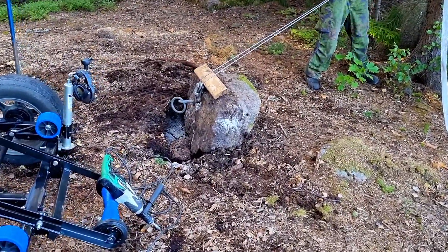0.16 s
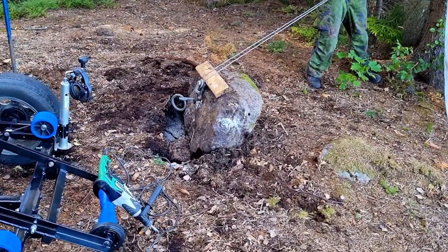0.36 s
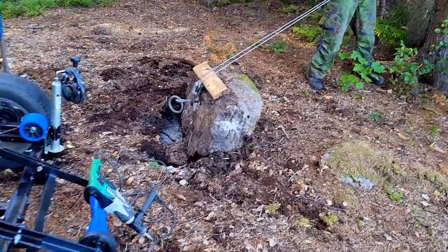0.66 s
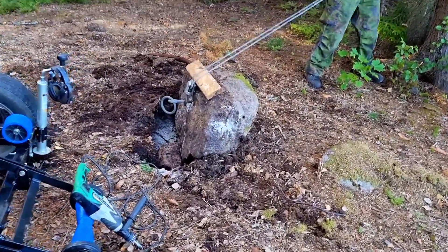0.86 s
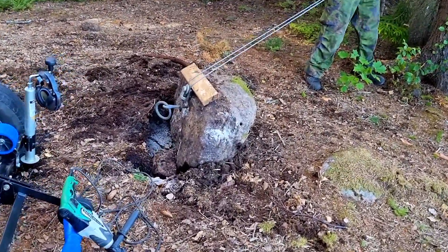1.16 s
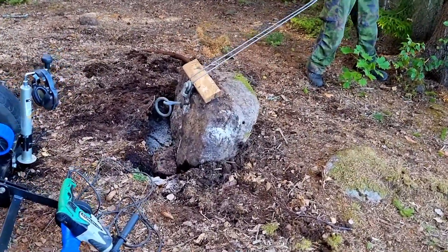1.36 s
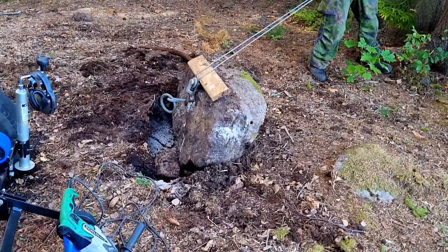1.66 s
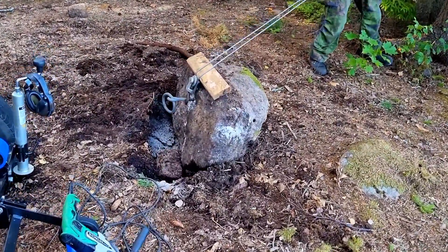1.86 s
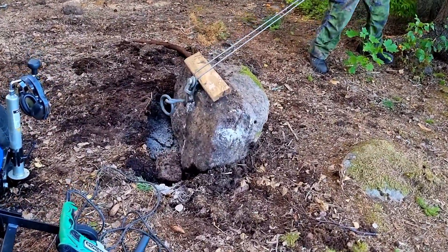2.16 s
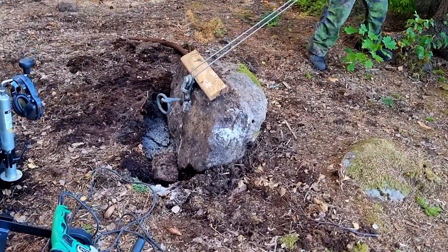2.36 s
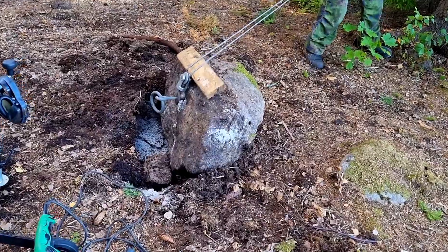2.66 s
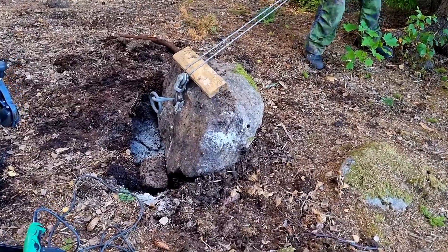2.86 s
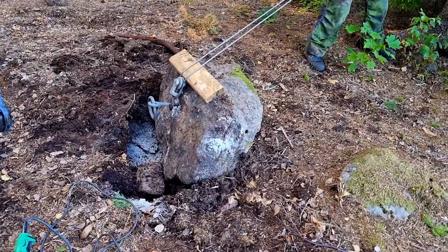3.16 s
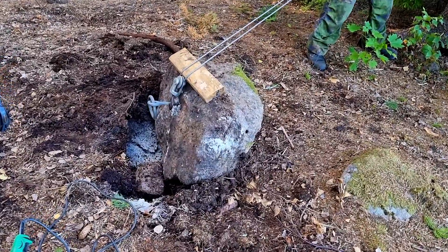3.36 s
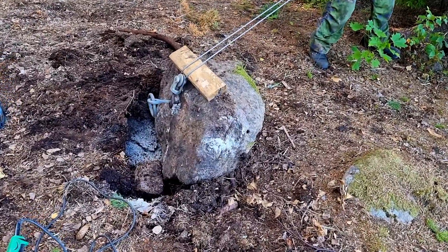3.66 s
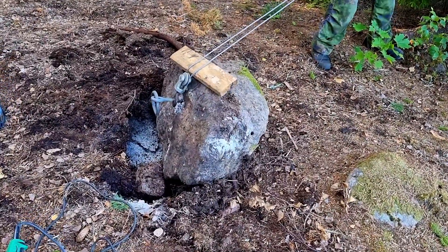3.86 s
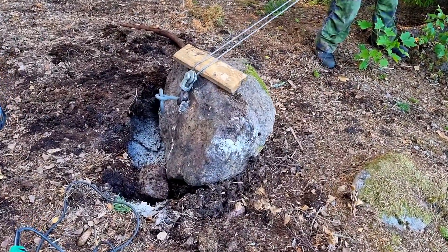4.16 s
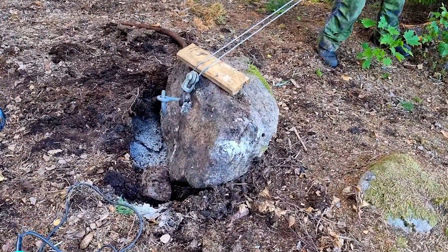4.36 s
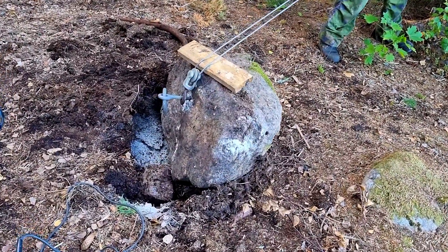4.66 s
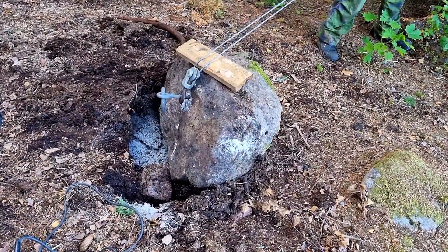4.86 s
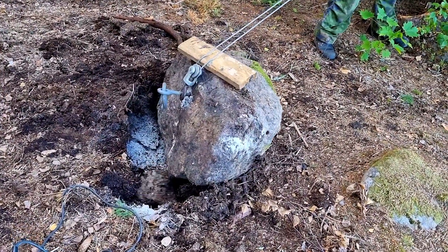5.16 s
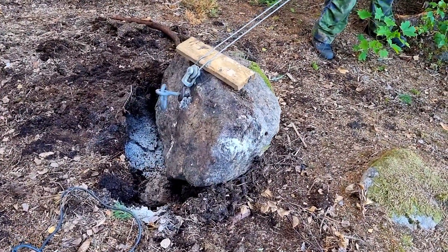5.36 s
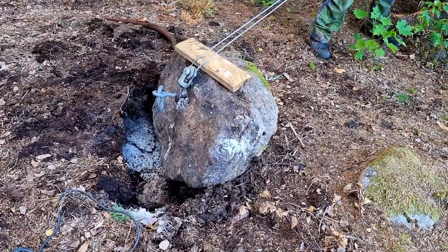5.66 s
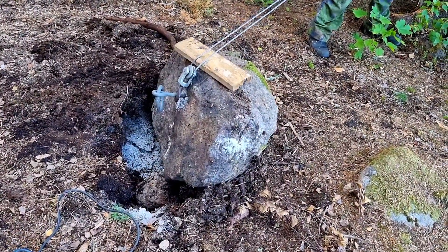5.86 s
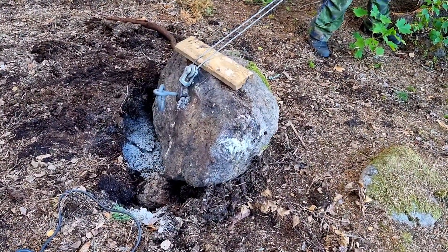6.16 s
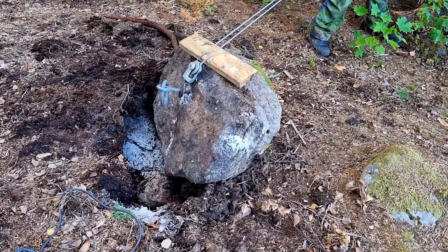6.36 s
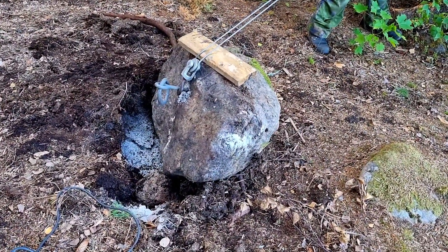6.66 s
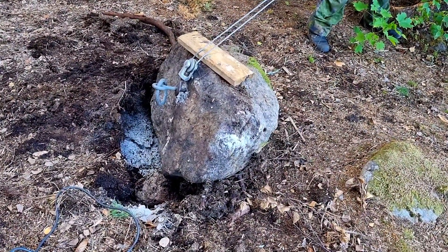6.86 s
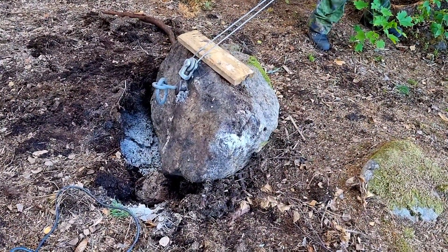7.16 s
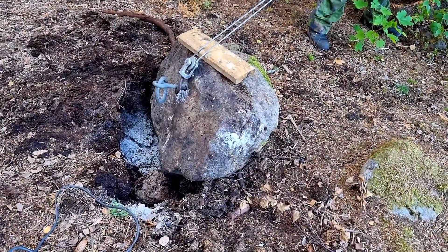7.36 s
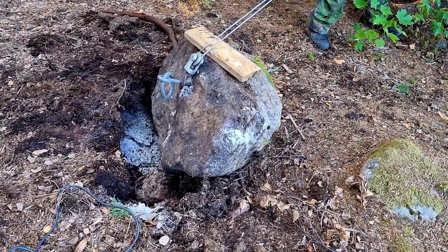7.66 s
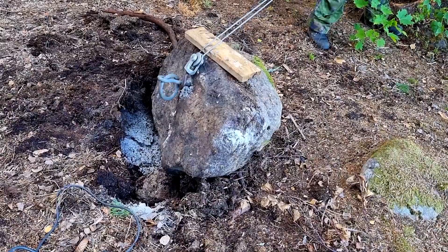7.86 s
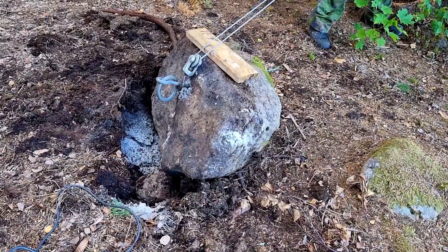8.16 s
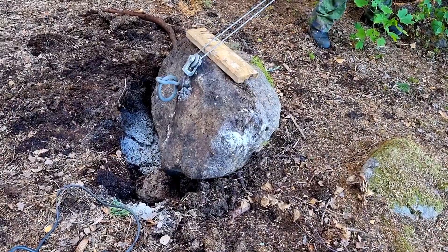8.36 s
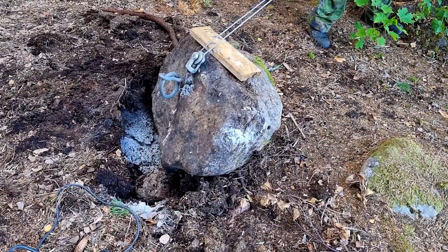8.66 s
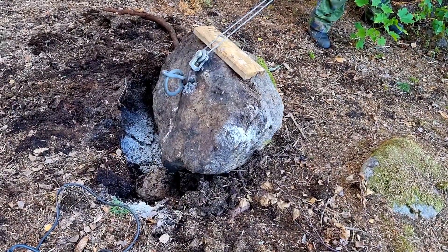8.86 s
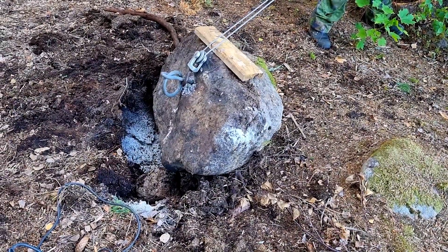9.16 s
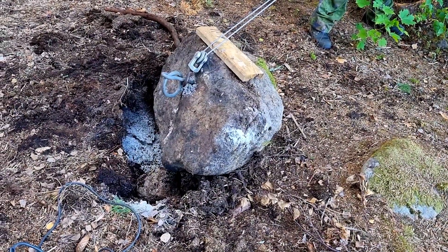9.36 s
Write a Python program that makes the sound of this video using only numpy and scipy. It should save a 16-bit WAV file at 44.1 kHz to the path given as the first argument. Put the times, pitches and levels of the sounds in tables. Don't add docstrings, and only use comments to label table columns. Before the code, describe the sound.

Outdoors in a forest, a hand cable winch works a few steps away, a little right of a stereo microphone. Quick groups of three bright metallic clicks alternate between two pawls, with lever clacks and chain ticks between. The boulder grinds low at first, the cable squeaks briefly before the middle, then the rock drops with a heavy thump. Clicking continues over soft hush with faint bird whistles.

```python
import sys
import numpy as np
from scipy import signal
from scipy.fft import rfft, irfft
from scipy.io import wavfile
from scipy.ndimage import uniform_filter1d

SR = 44100
rng = np.random.default_rng(int(sys.argv[2]) if len(sys.argv) > 2 else 0)


def boost_factor(decibels):
    exponent = np.asarray(decibels, float) / 20
    return 10 ** exponent


def generate_wav(signal):
    frames = np.transpose(np.atleast_2d(signal))
    scaled = np.clip(frames, -1, 1) * 32767
    pcm = np.round(scaled).astype(np.int16)
    wavfile.write(sys.argv[1], SR, pcm)


N = 418943

# time in seconds, pawl ring peak in dB, tooth contact in ms, frame peak in dB,
# loudest frame mode in Hz.
DRIVE_PAWL_DROPS = [(0.8858, -19.5, 5.8, -17, 5400), (0.9556, -15, 3, -17, 5400),
                    (1.0346, -19, 4.0, -18.5, 5600), (2.0926, -12.5, 3.5, -17.5, 2770),
                    (2.1638, -18, 8.9, -16.5, 7160), (2.2332, -18, 4.4, -15.5, 5620),
                    (3.2608, -14, 2.6, -16.5, 5840), (3.3381, -13.5, 2.1, -17.5, 5073),
                    (3.4117, -17.5, 3.95, -16, 5400), (4.5193, -15, 3.9, -17, 4878),
                    (4.5914, -15.5, 6.6, -16, 5000), (4.6807, -18.5, 5.3, -17, 5230),
                    (5.7197, -15, 4.2, -17, 6100), (5.7904, -18, 4.3, -17.5, 4600),
                    (5.8886, -23.5, 4.624, -19.5, 5770), (6.9518, -17, 3.4, -17, 4957),
                    (7.0194, -19, 3.5, -18, 3500), (7.1048, -19, 7.595, -17, 5100),
                    (8.1292, -15, 4.9, -18, 4100), (8.208, -17, 4.7, -19, 5600),
                    (8.2813, -20, 7.0, -17.5, 5230), (9.3423, -17, 4.1, -17.5, 3340),
                    (9.4253, -17.5, 3.654, -17, 5400)]
HOLD_PAWL_DROPS = [(0.0705, -13.5, 4, -19.5, 5400), (0.1523, -14, 2.3, -21, 5300),
                   (0.2358, -16.5, 2.41, -21.5, 5400), (1.388, -14.5, 4.0, -20, 5514),
                   (1.4769, -15, 2.8, -20.5, 7100), (1.5542, -14.5, 2.615, -18.5, 5592),
                   (2.5929, -18, 2.9, -20.5, 5450), (2.6752, -16, 1.8, -19, 2740),
                   (2.7405, -17.5, 1.51, -18, 5600), (3.7864, -16.5, 7.2, -20, 5650),
                   (3.8698, -15, 4, -17.5, 3700), (3.9376, -17, 3.9, -17.5, 5550),
                   (4.9718, -18, 4, -22, 3600), (5.049, -17.5, 2.4, -20.5, 5340),
                   (5.1218, -20, 4.8, -20, 5350), (6.1603, -16, 3.5, -20.5, 5330),
                   (6.2398, -17.5, 2.8, -23, 6996), (6.317, -18, 2.3, -19, 5100),
                   (7.4425, -20, 5.5, -21, 3730), (7.5208, -15, 4.8, -19.5, 5166),
                   (7.596, -19, 3.7, -21.5, 4052), (8.6332, -17.5, 5.5, -20.5, 3300),
                   (8.7094, -17, 4.4, -21.5, 5150), (8.7733, -17, 6.4, -18.5, 5657)]
HOUSING_DB = [-30, -42, -38.5, -30, -31.5, -33, -30, -40, -31.5, -30, -37, -44, -34, -37, -29, -31.5, -38,
              -34, -33, -43, -37, -30.5, -37]

# pitch in Hz, width in Hz, level in dB.
DRIVE_PAWL_MODES = [(11700, 900, -27), (13140, 540, -0.5), (13520, 460, 4), (14400, 530, -4),
                    (15300, 600, -12)]
HOLD_PAWL_MODES = [(10200, 700, -19), (11800, 390, -10), (12540, 240, 2.5), (13200, 580, -30),
                   (15600, 930, -20.5)]
FRAME_MODES = [(1550, 470, -8), (2195, 103, -10), (2650, 990, 1), (2680, 70, 3.5), (3740, 1260, 0),
               (5100, 130, 0.5), (5900, 800, -0.5), (6880, 570, 3), (7480, 840, 0.5), (11000, 17500, -8)]
HOUSING_MODES = [(900, 390, -16), (1200, 210, -7.5), (1560, 285, 1), (2180, 260, -1)]
CLACK_MODES = [(1550, 155, -3), (2100, 780, -1.5), (2800, 980, 3.5), (3550, 2240, -5.5), (4500, 2100, -14),
               (5400, 348.6, -3), (6800, 1700, -5), (12200, 6100, -19)]
TUBE_MODES = [(515, 62, -15.5), (680, 390, -16.5), (1430, 570, -16)]
LINK_MODES = [(3800, 2500, 2.5), (6570, 2000, -1), (10000, 930, -5), (11726, 900, -4.5), (13196, 1636, 6),
              (15813, 2950, 2)]

# time in seconds, clack peak in dB, handle tube ring in dB, loudest clack mode in Hz,
# chatter t60 in seconds.
SOFT_STOPS = [(.1075, -32, -56, 5200, .03), (.7126, -32, -40, 2279, .02), (.8075, -31, -34.5, 2304, 0.036),
              (2.0065, -35, -39.5, 2575, 0.058), (2.6214, -35.5, -50.5, 1842, .03),
              (2.7215, -30, -32, 1410, 0.025), (3.1571, -31, -39.5, 3430, 0.026),
              (5.0908, -54.5, -34, 1550, 0.071), (5.5034, -39.5, -45.5, 2568, 0.046),
              (5.6294, -35.5, -38.5, 3420, 0.019), (6.7696, -37.5, -47, 1951, .026),
              (6.8107, -40, -56, 2810, .016), (7.549, -33, -38, 1841, 0.032),
              (7.6035, -23, -28.5, 2920, 0.046), (7.6807, -34, -33, 1874, 0.043),
              (7.9225, -48, -64.5, 4014, .03), (7.9451, -30.5, -34, 2570, 0.045),
              (8.0041, -40.5, -47, 3800, .0125), (8.0412, -27, -34, 3430, 0.035),
              (8.7003, -31, -36, 5174, 0.056), (8.7983, -30, -42, 1970, 0.065),
              (9.1394, -36.5, -43.5, 2750, 0.041), (9.2477, -29, -36, 1560, 0.039)]
HARD_STOPS = [(1.2689, -24.5, -30, 5207, 0.058), (3.4875, -38.5, -44, 4100, 0.061),
              (3.6632, -24.5, -35.5, 5420, 0.068), (3.9679, -35, -34.5, 3967, 0.027),
              (4.4255, -30.5, -31.5, 3400, .05), (4.8324, -33, -38.5, 1349, 0.054),
              (4.9885, -45, -41.5, 3550, .033), (5.1057, -33, -31.5, 3950, 0.038),
              (6.0339, -29, -33.5, 3413, 0.069), (6.2368, -24.5, -27.5, 4200, 0.042),
              (6.3015, -32, -36, 3988, 0.036), (6.465, -34.5, -44.5, 3920, 0.046),
              (6.8685, -23.5, -28.5, 3530, 0.042), (7.2925, -24.5, -31, 3670, 0.049),
              (8.5089, -24.5, -29, 3610, 0.029), (8.753, -33, -34.5, 3559, 0.07),
              (8.9031, -38, -53, 3640, 0.01)]
DULL_CRACKS = [
    (.1035, -29, -52, 1770, 0.025),
    (.7075, -41, -53, 1800, 0.017),
    (2.7255, -17.5, -36, 2030, 0.013),
    (3.035, -44, -50.5, 5200, .02),
    (6.897, -39, -51, 2400, .03),
    (7.607, -26, -41, 1810, 0.027),
    (3.1495, -39, -37, 1410, .02),
    (4.364, -50, -50, 2000, .02),
    (9.157, -48, -50, 2000, .015),
]
# time in seconds, clack peak in dB, loudest clack mode in Hz,
# chatter t60 in seconds.
HOOK_TICKS = [(0.2672, -38.5, 1700, 0.041), (0.369, -39, 3255, 0.037), (0.4611, -47.5, 1900, 0.0519),
              (0.5592, -48, 3000, 0.0555), (1.677, -36.5, 2570, 0.039), (1.8954, -34, 2650, 0.034),
              (2.4666, -28, 2600, 0.054), (2.884, -41.5, 3370, 0.017), (3.891, -28.5, 4020, 0.04),
              (4.3202, -44, 2860, 0.042), (4.3437, -39, 3537, 0.051), (5.2383, -45.5, 6000, 0.077),
              (5.2602, -41.5, 3480, 0.023), (7.381, -43.5, 4200, 0.0517), (7.405, -46, 3900, 0.06),
              (7.726, -34.5, 3870, 0.013), (8.602, -42, 6300, 0.058), (8.654, -35.5, 3580, 0.06),
              (9.1551, -52, 4300, 0.053), (9.2241, -42, 1100, 0.05415)]
# time in seconds, peak in dB,
# tilt in dB per octave, chatter t60 in seconds.
LINK_SNAPS = [(0.3692, -41, -10, .012), (.565, -49, 0, .012), (4.86, -47, 9.5, .015),
              (5.202, -26, 3.5, 0.037), (5.239, -49, 1, .012), (7.315, -46, 5, .025),
              (7.4055, -42, 3, .025), (7.682, -45, 5, .02), (7.705, -47, 5, .015), (7.9185, -43, 7, .04),
              (7.944, -52, 8.5, .03), (8.004, -42, -0.597, .012), (9.139, -47, 2.2, 0.027),
              (9.1935, -36, -4, 0.019), (4.432, -36, -5, .02)]
# start in seconds, end in seconds, level in dB,
# pitch in Hz.
TUBE_HUMS = [
    (3.866, 4.067, -57.5, 1128),
    (4.961, 5.285, -60, 1100),
    (6.229, 6.43, -61, 1050),
    (7.381, 7.716, -59, 1033),
    (8.598, 8.906, -64, 1030),
]
# time in seconds, tube pitch in Hz.
TUBE_PITCH = [(0, 1250), (1.3, 1093), (2.3, 1033), (5.1, 1108), (5.5, 1043), (9.5, 1015)]
# time in seconds, then its lines as pitch in Hz,
# peak in dB, t60 in seconds.
CHIMES = [
    (3.892, [(4100, -33, 0.13), (8660, -27.5, .03), (10080, -26, .03), (15000, -20, .03)]),
    (7.607, [(2871, -31, 0.18), (2850, -58, 1.3), (7820, -43.5, 0.54)]),
]
# peak time in seconds, pitch in Hz, level in dB,
# octave in dB relative to it, seconds from the peak to 20 dB down.
CABLE_SLIPS = [
    (4.342, 5880, -39.5, -9.5, .018),
    (4.36, 5900, -49, -16, .007),
    (4.38, 5700, -56, -11, 0.07),
    (4.3976, 5740, -30.5, -22, .0085),
    (4.4178, 5740, -23.5, -28, .0135),
    (4.434, 5430, -41, -21, .008),
    (4.445, 5800, -52, -10, .01),
    (4.478, 5700, -57, -10, .01),
    (4.494, 5720, -59, -12, .012),
]

# time in seconds, peak in dB, pitch in Hz, soil slap in dB, slap top in Hz.
THUMPS = [(.122, -27, 163, -36, 900), (.144, -28, 187, -50, 500), (.525, -54, 111, -38.5, 1500),
          (0.574, -44, 200, -36.5, 1321), (0.691, -42, 97, -29.5, 1700), (0.707, -58.5, 90, -29, 2100),
          (3.029, -49.5, 287.8, -35, 556), (3.854, -29.5, 85, -47, 402.5), (4.001, -36, 170, -43, 394),
          (1.49, -39, 64.5, -42, 400), (5.175, -41, 149, -43, 500), (5.2176, -9.5, 102.2, -21.5, 750),
          (5.238, -19.5, 78.4, -23.5, 756), (5.277, -30, 150, -44, 700), (6.873, -31, 131, -26, 370)]
# time in seconds, peak in dB, pitch in Hz, t60 in seconds.
STONE_RAPS = [
    (.1445, -26, 164, 0.1),
    (5.2165, -26.5, 760, .015),
    (5.2385, -28, 650, .018),
    (3.028, -42, 394, 0.03),
    (5.2167, -17.5, 480, 0.018),
    (5.2382, -36, 370, 0.015),
    (6.876, -35.5, 304, 0.045),
    (5.224, -29, 307, 0.036),
]
# peak time in seconds, deep level in dB, upper level in dB,
# build-up in seconds, settling in seconds for 20 dB.
LURCHES = [
    (.15, -49, -32.5, 0.059, 0.01),
    (.22, -50, -39.5, 0.12, 0.2),
    (.31, -50, -41, .1, 0.22),
    (.36, -51, -45.5, .05, 0.24),
    (.03, -55, -44.5, .2, 0.4),
    (1.5, -43, -66, 0.053, 0.08),
    (3.91, -42, -50.5, 0.15, 0.17),
    (5.081, -45, -50, 0.082, 0.17),
    (5.242, -49, -35, 0.033, 0.03),
    (6.88, -60, -63.5, 0.056, 1.3),
]

# start in seconds, length in
# seconds, first pitch in Hz, last pitch in Hz, level in dB.
BIRD_CALLS = [(1.826, 0.097, 4520, 4600, -53.5), (1.96, .13, 4120, 4180, -57.5),
              (2.183, .06, 4800, 4900, -57), (3.051, 0.23, 4640, 4380, -62),
              (3.443, 0.21, 4090, 3970, -59.5), (2.486, 0.097, 7500, 8000, -60),
              (2.858, 0.11, 7900, 6915, -62), (7.745, 0.114, 2300, 2130, -66),
              (8.912, 0.058, 3660, 3680, -61), (9.002, 0.06, 3570, 3620, -58.5),
              (9.07, .05, 3620, 3560, -67)]
# frequency in Hz, t60 in seconds.
TREE_T60 = [(300, 0.37), (1000, 0.132), (3000, 0.31), (8000, 0.21), (14000, 0.23)]
# frequency in Hz, level in dB per Hz.
AIR_SPECTRUM = [(25, -19), (40, -6), (65, -26), (100, -6), (200, -10), (400, -13.5), (1000, -15.5),
                (1800, -20), (4000, -16.5), (7600, -23), (9200, -33), (13000, -29.5), (15600, -32),
                (16400, -33)]
# time in seconds, level in dB.
AIR_LEVEL = [(0.0, -40.5), (0.4, -44.5), (5.16, -50), (5.24, -52), (9.31, -52), (9.5, -54.5)]
# frequency in Hz, left-right likeness from -1 to 1.
PORT_LIKENESS = [(60, 0.65), (150, 0.89), (380, 0.14), (950, -0.098), (2380, -0.39), (5980, -0.039),
                 (15000, -0.091)]
# frequency in Hz, level in dB.
FAR_PORT_SHADE = [(1200, -0.5), (2500, 1.5), (5600, -2), (9000, 2.5), (12500, 0)]

LEFT_LAG = 9
ALIKE = 0.72
FRAME_PAN_DB, KNOCK_PAN_DB = -4, -3
LEAD_S = 0.02
RING_LAG_S = 0.0007
DETUNE = 0.015
SCATTER_DB = 1.4
SMALL_MODES_DB = 2.1
PORT_DIP_HZ, PORT_DIP_WIDTH_HZ, PORT_DIP_DB = 9380, 1500, -4.5
TUBE_FREE_HZ, TUBE_HELD_HZ = 115, 200


def evened(x):
    return x / np.sqrt(np.mean(x ** 2) + 1e-20)


def read(points, hz):
    f, value = np.transpose(points)
    return np.interp(np.log(hz + 1), np.log(f + 1), value)


def smooth_twice(x, size):
    return uniform_filter1d(uniform_filter1d(x, size), size)


def band(x, low_hz, high_hz):
    sos = signal.butter(N=2, Wn=[low_hz, high_hz], btype="band", fs=SR, output="sos")
    return signal.sosfilt(sos, x)


def add(mix, s, sound):
    part = mix[:, round(s * SR):][:, :sound.shape[-1]]
    part += sound[..., :part.shape[1]]


def ports(pan_db):
    return boost_factor([[pan_db / 2], [-pan_db / 2]])


def at_ports(size, strike=0):
    near, other = rng.standard_normal((2, len(size)))
    far = ALIKE * near + np.sqrt(1 - ALIKE ** 2) * other
    return np.array([np.roll(strike + size * far, LEFT_LAG), strike + size * near])


def ring(drive, modes, detune, low_hz, tilt_db=0, order=1):
    hz = np.fft.rfftfreq(drive.shape[1], 1 / SR)
    power = 0
    for f, width, db in modes:
        shift, luck = rng.standard_normal(2)
        peak = boost_factor(db + tilt_db * np.log2(f / 3000) + SCATTER_DB * luck) ** 2
        power = power + peak / (1 + (2 * (hz - f * (1 + detune * shift)) / width) ** 2) ** order
    power = power * boost_factor(2 * SMALL_MODES_DB * evened(smooth_twice(rng.standard_normal(len(hz)), 9)))
    power = power / (1 + (low_hz / (hz + 1)) ** 8)
    power = power * boost_factor(2 * PORT_DIP_DB * np.exp(-((hz - PORT_DIP_HZ) / PORT_DIP_WIDTH_HZ) ** 2))
    cepstrum = irfft(np.log(power + 1e-12))
    cepstrum[0] = cepstrum[0] / 2
    cepstrum[len(hz) - 1:] = 0
    out = irfft(rfft(drive) * np.exp(rfft(cepstrum)) * boost_factor([read(FAR_PORT_SHADE, hz), 0 * hz]))
    return out / (2.6 * np.sqrt(uniform_filter1d(out[1] ** 2, size=260).max()))


def seating(contact_s, level_db, t60, bounce_s, bounce_db):
    t = np.arange(4096) / SR - LEAD_S
    after = np.maximum(t, 0)
    free = np.maximum(t - contact_s, 0)
    contact = boost_factor(-9000 * free - 150 * after) + 0.42 * np.exp(-after / 0.00035)
    bounce = boost_factor(bounce_db) * np.exp(-((free - bounce_s) / 0.0032) ** 2)
    settling = boost_factor(level_db - 60 * free / t60) + bounce
    size = np.where(t < 0, boost_factor(-11.5 + 2000 * t), contact + settling)
    lumps = evened(uniform_filter1d(rng.standard_normal(len(t)), size=45))
    return at_ports(size * boost_factor(2.8 * lumps))


def rattle(t60, scrape_db, lumps_db=3.5, hardness=1.0, tail_db=-1.0):
    t = np.arange(4096) / SR - LEAD_S
    after = np.maximum(t, 0)
    scrape = boost_factor(scrape_db + 2470 * np.minimum(t, 0)) * (t < 0)
    chatter = boost_factor(-60 * after / max(t60, .005)) + boost_factor(tail_db - 60 * after / 0.04)
    drop = (1 - np.exp(-after / 0.0014)) * chatter
    crack = hardness * np.exp(-after / 0.00055) * (t >= 0)
    lumps = evened(uniform_filter1d(rng.standard_normal(len(t)), 45))
    strike = 4.9 * hardness * np.sinc((t - 0.0016) * SR)
    return at_ports((scrape + drop + crack) * boost_factor(lumps_db * lumps), strike)


def pawl(drops, modes, pan_db, chatter_t60, frame_low_hz, settles):
    out = np.zeros((2, N))
    for s, ring_db, contact_ms, frame_db, hz in drops:
        seat = seating(contact_ms / 1000 - RING_LAG_S, *settles)
        high = boost_factor(ring_db + 0.5) * ring(seat, modes, DETUNE / 5, 10400, order=1.3)
        blow = rattle(chatter_t60, -11.5, 2.94, 1.6)
        low = ring(blow, FRAME_MODES + [(hz, 600, 2.5)], DETUNE, frame_low_hz, order=1.4)
        low = boost_factor(frame_db - 0.25) * low
        add(out, s - RING_LAG_S - LEAD_S, high * ports(pan_db) + low * ports(FRAME_PAN_DB))
    return out


def pawls():
    drive = pawl(DRIVE_PAWL_DROPS, DRIVE_PAWL_MODES, pan_db=-8, chatter_t60=0.036,
                 frame_low_hz=2640, settles=(-4.5, .055, -3.8, -16))
    hold = pawl(HOLD_PAWL_DROPS, HOLD_PAWL_MODES, pan_db=-10.5, chatter_t60=0.09,
                frame_low_hz=990, settles=(-5.5, 0.04, -1.3, -8))
    return drive + hold


def housing():
    out = np.zeros((2, N))
    for row, db in zip(DRIVE_PAWL_DROPS, HOUSING_DB):
        knock = ring(rattle(0.019, -18, 1.2, 2.2, -10.0), HOUSING_MODES, DETUNE, 610, order=2)
        add(out, row[0] - LEAD_S, boost_factor(db) * knock * ports(KNOCK_PAN_DB))
    return out


def knocks():
    out = np.zeros((2, N))
    hook = [(s, db, db - 15, hz, t60) for s, db, hz, t60 in HOOK_TICKS]
    groups = ((SOFT_STOPS, -3.5, -7.0), (HARD_STOPS, 1.2, -7.0), (hook, -0.1, -7.0),
              (DULL_CRACKS, -5, -20))
    for rows, tilt_db, tail_db in groups:
        for s, clack_db, tube_db, hz, t60 in rows:
            blow = rattle(t60, -20 + 220 * t60, 2.36, 0.89, tail_db)
            clack = ring(blow, CLACK_MODES + [(hz, 500, 4.0)], DETUNE, 870, tilt_db, order=2)
            tube_hz = np.interp(s, *np.transpose(TUBE_PITCH))
            loaded = any(row[0] < s < row[1] for row in TUBE_HUMS)
            width = TUBE_FREE_HZ if loaded else TUBE_HELD_HZ
            tube = ring(blow, TUBE_MODES + [(tube_hz, width, 1.5)], DETUNE, 190, order=2)
            both = boost_factor(clack_db + 2.5) * clack + boost_factor(tube_db + 1.5) * tube
            add(out, s - LEAD_S, both * ports(KNOCK_PAN_DB))
    return out


def link_snaps():
    out = np.zeros((2, N))
    for s, db, tilt_db, t60 in LINK_SNAPS:
        snap = ring(rattle(t60, -24, 3.5, 0.97, -22.0), LINK_MODES, DETUNE, 1412, tilt_db)
        add(out, s - LEAD_S, boost_factor(db) * snap * ports(-6.5))
    return out


def tube_hums():
    out = np.zeros((2, N))
    for start, end, db, hz in TUBE_HUMS:
        rub = rng.standard_normal(round((end - start) * SR))
        hum = boost_factor(db) * evened(band(rub, hz - 45, hz + 45)) * signal.windows.tukey(len(rub), .6)
        add(out, start, np.array([np.roll(hum, LEFT_LAG), hum]) * ports(KNOCK_PAN_DB))
    return out


def chimes():
    out = np.zeros((2, N))
    t = np.arange(SR // 2) / SR
    for s, modes in CHIMES:
        tone = sum(boost_factor(db - 60 * t / t60) * np.sin(2 * np.pi * hz * t) for hz, db, t60 in modes)
        add(out, s, np.array([0.34 * np.roll(tone, LEFT_LAG), tone]) * np.minimum(t / 0.0018, 1))
    return out


def whistle(rows, waver_db, wander, size):
    s, *columns = np.transpose(rows)
    t = np.arange(s[0], s[-1], 1 / SR)
    hz, *levels = (np.interp(t, s, c) for c in columns)
    waver = evened(smooth_twice(rng.standard_normal(len(t)), size))
    turns = np.cumsum(hz * (1 + wander * np.roll(waver, 2000))) / SR
    tone = 0
    for harmonic, db in enumerate(levels, 1):
        tone = tone + boost_factor(db + waver_db * waver) * np.sin(2 * np.pi * harmonic * turns)
    return s[0], tone * signal.windows.tukey(len(t), .1)


def cable_squeaks():
    out = np.zeros((2, N))
    for s, hz, db, octave_db, half_s in CABLE_SLIPS:
        u = np.linspace(-1.4, 1.4, num=25) * half_s
        level_db = db - 20 * (u / half_s) ** 2
        sag_hz = hz - 3000 * u
        rows = np.transpose([s + u, sag_hz, level_db, level_db + octave_db])
        start, tone = whistle(rows, 0.8, .003, size=60)
        add(out, start, tone * ports(-5.5))
    return out


def rock_thumps():
    out = np.zeros((2, N))
    t = np.arange(SR // 5) / SR
    for s, db, hz, slap_db, top_hz in THUMPS:
        sag = hz * (t + 0.0102 * (1 - np.exp(-t / 0.002)))
        push = boost_factor(db - 60 * t / 0.0893) * (1 - np.exp(-t / 0.0082)) * np.sin(2 * np.pi * sag)
        soil = evened(band(band(rng.standard_normal(len(t)), 200.0, top_hz), 200.0, top_hz))
        slap = boost_factor(slap_db - 60 * t / 0.025) * (1 - np.exp(-t / 0.0022)) * soil
        add(out, s, np.array([np.roll(push, 30) + slap, push + np.roll(slap, 6)]) * ports(-.7))
    for s, db, hz, t60 in STONE_RAPS:
        size = boost_factor(db - 60 * t / t60) * (1 - np.exp(-t / 0.0015))
        add(out, s, size * np.sin(2 * np.pi * hz * t))
    return out


def rock_grind():
    out = np.zeros((2, N))
    time = np.arange(N) / SR
    deep, upper = boost_factor(-59.5), boost_factor(-68.5)
    for s, deep_db, upper_db, build_s, settle_s in LURCHES:
        lurch = boost_factor(-20 * np.maximum((s - time) / build_s, (time - s) / settle_s))
        deep = np.maximum(deep, boost_factor(deep_db) * lurch)
        upper = np.maximum(upper, boost_factor(upper_db) * lurch)
    grit = boost_factor(-16.5) * upper
    common, left, right = rng.standard_normal((3, N))
    noise = common + 0.33 * np.array([left, right])
    for size, low_hz, high_hz in (deep, 50, 105), (upper, 115, 270), (grit, 340, 760):
        rumble = evened(band(band(noise, low_hz, high_hz), low_hz, high_hz))
        out += size * boost_factor(-2.5) * rumble
    return out


def birds():
    out = np.zeros((2, N))
    for s, length, first_hz, last_hz, db in BIRD_CALLS:
        rows = [(s, first_hz, db), (s + length, last_hz, db - 4.5)]
        start, tone = whistle(rows, 4.0, .008, size=170)
        add(out, start, tone * ports(-8.0))
    return out


def trees(x):
    out = np.zeros((2, N))
    size = SR // 2
    turn = np.arange(N) / SR * 5.3
    for k in range(3):
        taps = np.zeros((2, size))
        at = np.arange(260, size - 20, 10) + rng.integers(0, 10, (2, (size - 271) // 10))
        np.put_along_axis(taps, at, rng.choice([-1., 1.], at.shape), 1)
        hz, t, z = signal.stft(taps, SR, nperseg=256)
        decay = boost_factor(-60 * t / read(TREE_T60, hz)[:, None])
        tail = signal.istft(z * decay, SR, nperseg=256)[1]
        share = np.sqrt(2 / 3) * np.cos(np.pi * (turn + k / 3))
        out += signal.oaconvolve(x * share, tail / np.linalg.norm(tail[0]), axes=1)[:, :N]
    return out


def air():
    frames, hz = N // 256 + 5, np.fft.rfftfreq(1024, 1 / SR)
    a, b, c, d, patches = rng.standard_normal((frames, 513, 5)).T
    patches = evened(uniform_filter1d(uniform_filter1d(patches, 14, 0), 10, 1))
    same = np.clip(read(PORT_LIKENESS, hz), -1, 1)[:, None]
    left = a + 1j * b
    right = same * left + np.sqrt(1 - same ** 2) * (c + 1j * d)
    z = np.array([left, right]) * boost_factor(read(AIR_SPECTRUM, hz)[:, None] + 2.73 * patches)
    s, level_db = np.transpose(AIR_LEVEL)
    swell_db = np.interp(np.arange(frames) * 256 / SR, s, level_db)
    follows = read([(150, 0.4), (600, 0.76), (6000, 0.75), (12000, 0.79)], hz)[:, None]
    rms = np.sqrt(np.mean(abs(signal.istft(z, nperseg=1024, noverlap=768)[1]) ** 2))
    z *= boost_factor(follows * (swell_db + 57.5) - 61.0) / rms
    return signal.istft(z, nperseg=1024, noverlap=768)[1][:, :N] * ports(-1.8)


def scene():
    winch = pawls() + housing() + knocks() + link_snaps() + tube_hums() + chimes() + cable_squeaks()
    echoing = winch + birds()
    return echoing + boost_factor(-13.5) * trees(echoing) + rock_thumps() + rock_grind() + air()


def top_cut(x):
    return signal.sosfilt(signal.butter(12, 16960, fs=SR, output="sos"), x)


def record(dry):
    edge = signal.firwin(127, 15850, window=("kaiser", 3), fs=SR)
    mix = signal.oaconvolve(dry, edge[None], "same") + boost_factor(-35.5) * dry
    return top_cut(mix)


dry = scene()
out = record(dry)
generate_wav(out)
```